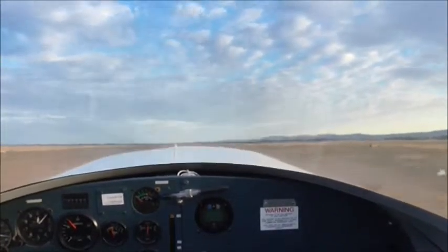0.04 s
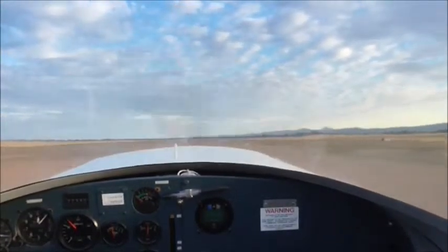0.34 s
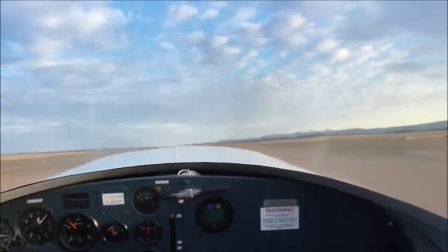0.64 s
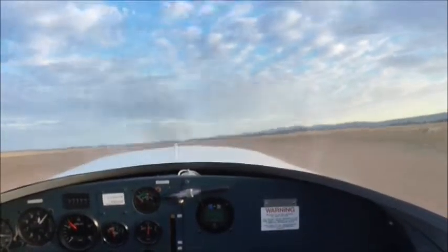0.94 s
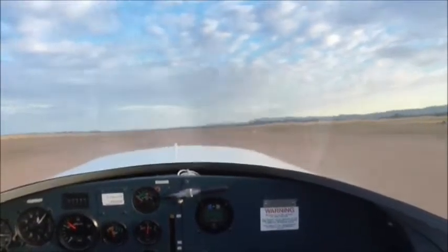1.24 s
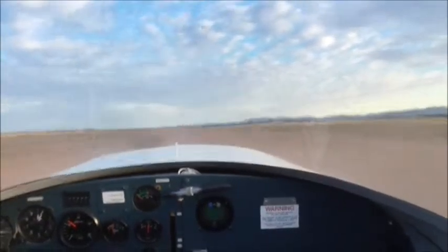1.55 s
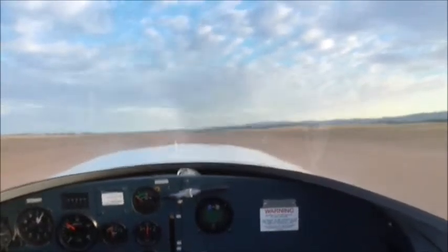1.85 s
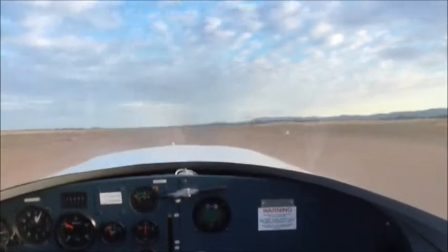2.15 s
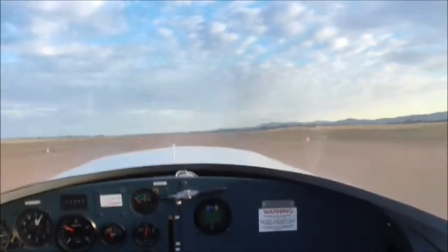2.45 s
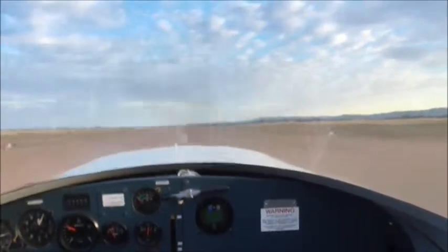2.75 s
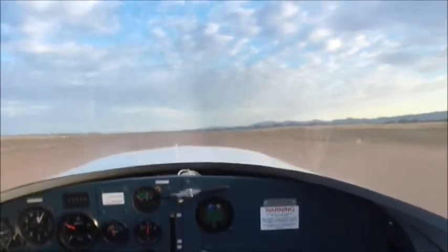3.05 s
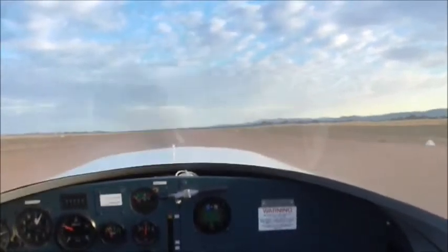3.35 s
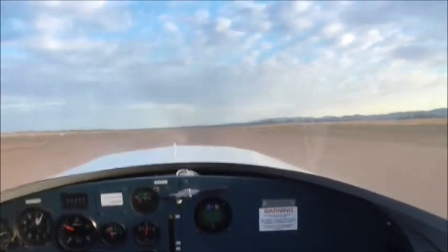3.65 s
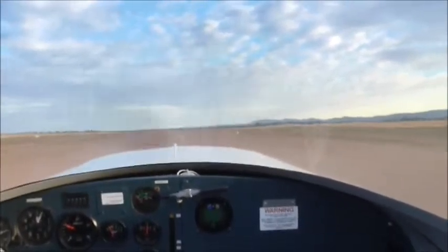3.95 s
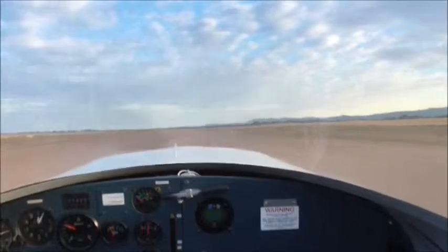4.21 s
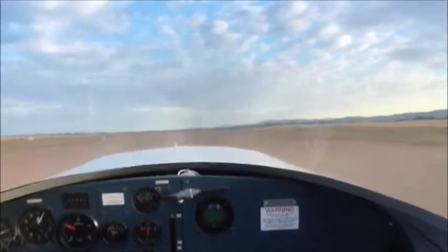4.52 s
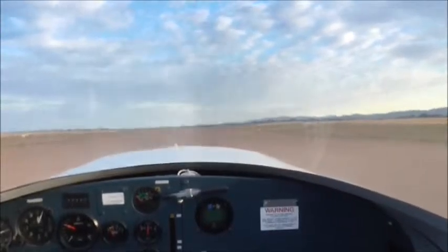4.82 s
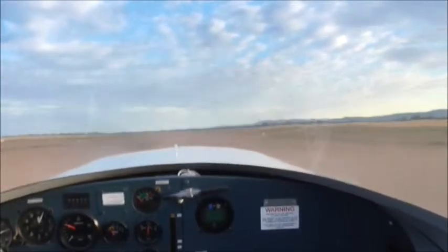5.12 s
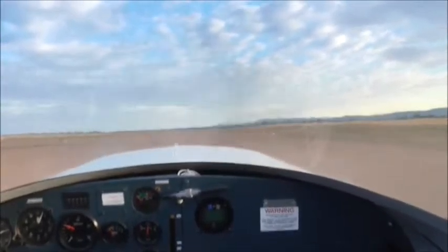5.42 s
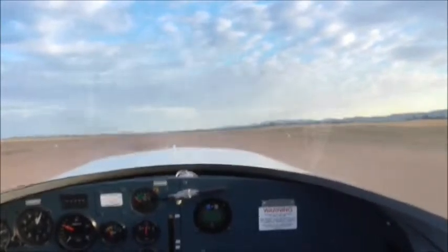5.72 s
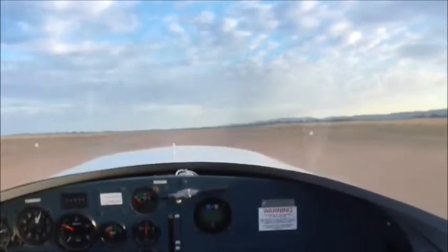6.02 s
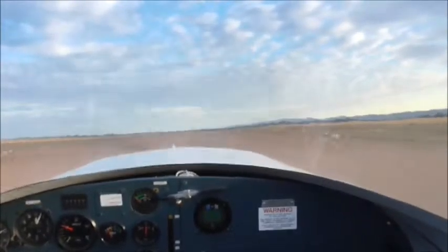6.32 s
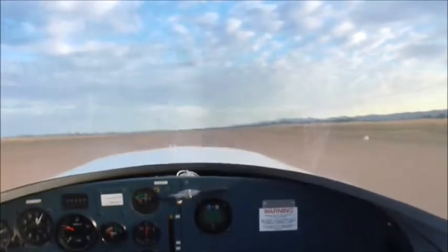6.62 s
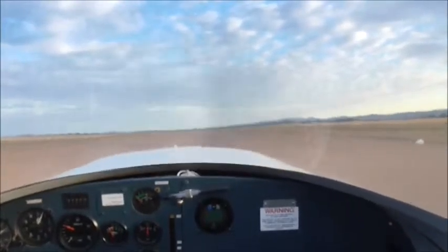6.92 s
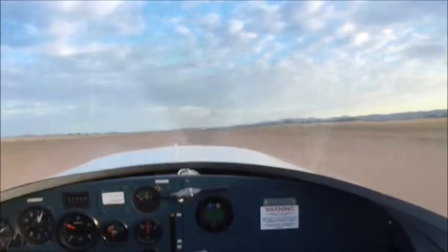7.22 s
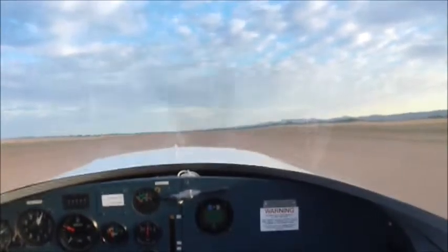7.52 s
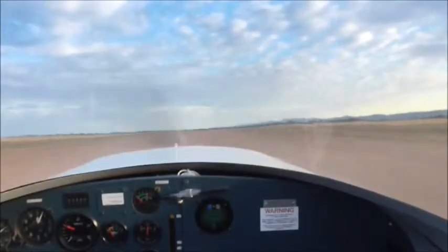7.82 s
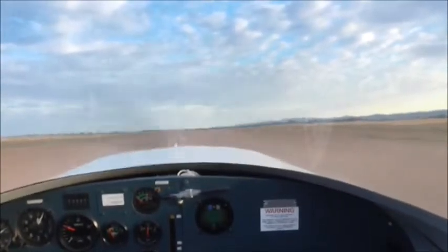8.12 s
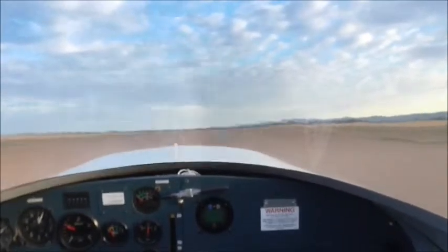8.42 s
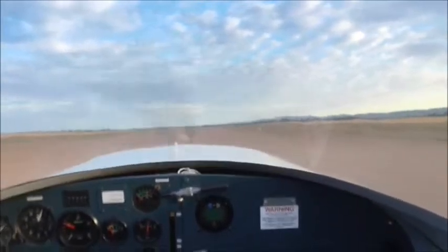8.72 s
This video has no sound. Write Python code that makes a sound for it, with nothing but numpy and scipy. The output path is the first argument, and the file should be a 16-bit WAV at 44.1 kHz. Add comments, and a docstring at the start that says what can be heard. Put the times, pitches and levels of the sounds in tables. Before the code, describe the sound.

Heard from inside the cockpit of a light aircraft, air hisses past the canopy over an idling propeller. After a second the wheels thump down hard and skip twice with brief tyre scrubs, while the air and engine drop away. Rough ground then drums on the hollow fuselage and gravel crunches under the tyres. Thrown stones crack against the skin, grit sprays underneath, and loose fittings rattle and tick.

```python
"""Air hisses past the canopy over an idling propeller: the cockpit of a light aircraft landing on gravel.
At 1 s the wheels thump down and skip twice. Rough ground then drums on the hollow fuselage, gravel
crunches under the tyres, thrown stones crack against the skin and loose fittings rattle.
Engine and thumps are sums of sines; the rest is enveloped noise shaped by spectra and damped modes."""
import sys
import numpy as np
from scipy import signal
from scipy.fft import rfft, irfft, next_fast_len
from scipy.io import wavfile
from scipy.ndimage import uniform_filter1d, minimum_filter1d

SR = 44100
rng = np.random.default_rng(int(sys.argv[2]) if len(sys.argv) > 2 else 0)


def transcribe(u):
    """Save the signal u as a 16-bit wav file named by the first command-line argument.

    u: samples, shape (n,) or (channels, n), limited to [-1, 1]; the rate is SR.
    q: integer samples, one column per channel.
    """
    v = np.clip(np.atleast_2d(u).T, -1, 1)
    q = np.round(v * 32767).astype(np.int16)
    wavfile.write(sys.argv[1], SR, q)


N = 390726
FFT_SIZE = next_fast_len(N + 8192)
TIME_S = np.arange(N) / SR
FREQ_HZ = np.maximum(np.arange(FFT_SIZE // 2 + 1) * SR / FFT_SIZE, 1)
TOUCHDOWN_S = .983
ROLLED_S = TIME_S - TOUCHDOWN_S

# Table levels are relative; sigma is the half length of a bell-shaped swell.
SIDE_SPECTRUM = [(60, -39), (110, -17), (200, -13.5), (380, -15.5), (700, -6.5), (1290, -7.5), (2380, -5),
                 (4400, -6.5), (8120, -5.5), (15000, 0.5)]  # stereo side over mid: f/Hz, level/dB

BLADE_RATE_HZ = [(0, 42.8), (.5, 42.2), (.85, 39.57), (1.1, 38.2), (1.35, 35.1), (1.75, 33.2), (2.3, 32.2),
                 (3, 31.16), (8.86, 28.06)]  # propeller blade passes: t/s, f/Hz
ENGINE_DB = [(0, -32.5), (.9, -30), (1.15, -40), (1.8, -62), (3, -52.5), (8.86, -47)]  # idling engine: t/s, level/dB
BLADE_HARMONICS = [(1, 1.5), (2, 8), (3, 8.5), (4, -8), (5, 2), (6, 6), (8, -1), (9, -3), (11, -6)]  # propeller tones: multiple of blade rate, level/dB
AIRFLOW_DB = [(0, -15), (.2, -17.5), (.36, -15.5), (.55, -17.5), (.8, -16), (.89, -18), (.955, -14.5),
              (1.05, -23.5), (1.5, -27), (2.5, -30.5), (8.86, -32.5)]  # slipstream: t/s, level/dB
AIR_SPECTRUM = [(15, -45), (30, -40), (58, -18), (100, -4), (150, -12.5), (220, -3.5), (300, -11.5),
                (370, -11), (530, -17), (1000, -25), (2000, -30), (2900, -39.5), (4000, -34), (7000, -43.5),
                (15000, -59)]  # slipstream: f/Hz, level/dB
CABIN_AIR_MODES = [(101, 18, -1), (225, 35, 1), (348, 20, 4), (750, 40, 3)]  # air-driven resonances: f/Hz, width/Hz, level/dB
SEAL_GUSTS = [(0.053, -32, 0.032), (.298, -30, 0.0091), (0.823, -31, 0.022), (0.954, -31.5, 0.006)]  # gusts at the canopy seal: t/s, level/dB, sigma/s
GUST_SPECTRUM = [(300, -20), (1000, 5), (2000, 6), (2900, -2), (4200, 2.5), (7000, -9), (15000, -32)]  # rasp of the seal: f/Hz, level/dB

# touchdown thumps, with a brief 1 kHz overload overtone on the first: t/s, level/dB, f/Hz, t60/s
TOUCHDOWN_THUMPS = [(.9815, 8.5, 201, .25), (.99, -20, 1000, .15), (1.004, -13, 460, .15),
                    (1.027, -4, 262, .4), (1.032, -9, 475, .12), (1.052, -15, 640, .3),
                    (1.1255, 4.5, 212, .07), (1.553, -7, 345, .25)]
TYRE_LOAD_DB = [(1.1, -17.5), (1.21, -19.5), (1.4, -13.5), (1.49, -18.5), (1.55, -12.5), (2.13, -21),
                (2.23, -12.5), (2.59, -19.5), (2.75, -16.5), (4.1, -15), (5.1, -16), (8.86, -16)]  # tyre load as rumble, dipping at the skips: t/s, level/dB
GROUND_RUTS = [(4.55, -21), (4.845, -13.5), (7.25, -15), (7.61, -15.5)]  # ruts knocking the fuselage: t/s, level/dB
RUMBLE_SPECTRUM = [(15, -54), (28, -41), (35, -20), (65, -27), (95, -13.5), (130, -12), (150, -19),
                   (190, -7.5), (295, -13.5), (350, -9.5), (470, -14), (700, -27), (1000, -36.5),
                   (2000, -74)]  # ground rumble: f/Hz, level/dB
FUSELAGE_MODES = [(101, 11, 3.5), (127.4, 6.9, 4.5), (169, 11, -1.5), (268, 31, 5), (339, 19, -2),
                  (370, 24, -5), (461, 13, 0), (632, 29, 1)]  # hollow fuselage: f/Hz, width/Hz, level/dB
CRUNCH_SPECTRUM = [(300, -41), (700, 3.5), (1000, 6), (1500, 5), (2100, -6), (2600, -10.5), (3200, -20.5),
                   (4200, -27), (7000, -39), (14000, -64)]  # gravel under the tyres: f/Hz, level/dB
UNDERCARRIAGE_MODES = [(777, 30, 3), (935, 35, -1), (1062, 40, 1), (1245, 25, -2), (1385, 45, -1),
                       (1545, 28, 2), (1633, 20, 4), (1818, 24, -3), (1897, 18, 2), (1928, 16, -2),
                       (2012, 14, -1), (2065, 22, -4), (2130, 20, -7), (2235, 20, -6)]  # wheel assemblies: f/Hz, width/Hz, level/dB

SHAKE_DB = [(1, -52), (2.4, -49), (2.56, -58), (2.68, -51.5), (3.9, -48), (4.1, -52), (4.3, -46.5),
            (4.75, -49), (5.06, -53), (5.3, -51), (5.85, -49), (6.7, -49.5), (8.86, -48)]  # shaking between jolts: t/s, level/dB
FITTING_JOLTS = [(.98, -31, 0.26), (1.12, -42, 0.15), (1.29, -45, 0.36), (1.7, -48, 1), (2.16, -39.5, 0.2),
                 (2.27, -43, 0.5), (2.655, -43, 0.31), (3.01, -43, .4), (3.37, -54, .3), (3.44, -48, 0.78),
                 (3.68, -49, 1.6), (4.34, -43, 0.23), (4.54, -49, 0.83), (5.125, -39, 0.44),
                 (5.19, -49, 0.27), (5.37, -44, .5), (5.45, -42.5, 0.69), (5.69, -42, .3),
                 (5.87, -42, 0.18), (6.87, -42.5, 0.65), (7.25, -45, 1), (7.53, -44, .4),
                 (7.745, -39, 0.21), (8.03, -46, 0.19), (8.45, -55, .7), (8.63, -42, 0.7), (8.82, -49, .4)]  # jolts to the fittings: t/s, level/dB, t60/s
RATTLE_SPECTRUM = [(1500, -4), (2800, 0), (4000, 2.5), (6500, 1.5), (8000, -0.5), (9100, 3), (10400, -6.5),
                   (11600, -4), (13000, -14), (15500, -45)]  # loose fittings: f/Hz, level/dB
UNDERCARRIAGE_KNOCKS = [(.985, -12, .15), (1.0345, -20, 0.16), (1.335, -21, 0.1)]  # blows to the shell: t/s, level/dB, t60/s
SHELL_MODES = [(350, 70, -3), (543, 100, 13), (680, 140, -7), (1010, 220, -1), (1390, 250, -11),
               (2030, 400, -5)]  # hollow knock: f/Hz, width/Hz, level/dB
SHELL_SPECTRUM = [(150, -20), (400, 2), (2200, -7), (3200, -12), (8000, -30)]  # hollow knock: f/Hz, level/dB
SHARP_TICKS = [(.9983, -24), (1.192, -29), (1.2857, -36), (1.4765, -34), (2.2829, -40), (3.2637, -34),
               (3.4817, -37), (4.66, -32), (5.1215, -37), (5.2023, -40), (5.3805, -33), (5.396, -36),
               (5.4715, -31), (5.9925, -38), (6.3175, -32), (6.3457, -34), (6.3907, -31), (6.4594, -31),
               (7.1174, -30), (7.1362, -32), (7.3145, -30), (7.3594, -34), (7.4337, -37), (7.4918, -30),
               (7.5335, -36), (7.5489, -31), (7.6856, -33), (7.727, -29), (7.9163, -32), (7.928, -36),
               (8.0663, -32), (8.083, -31), (8.1255, -29), (8.141, -31), (8.643, -28)]  # hardest contacts of the fittings: t/s, level/dB
TICK_SPECTRUM = [(2000, -22), (4000, -5), (7000, 0), (10000, -3), (11800, -2), (13500, -9), (15500, -16)]  # hard contact: f/Hz, level/dB
METAL_MODES = [(8850, 260, -1), (9400, 300, -4), (11370, 220, 1)]  # small metal part: f/Hz, nominal width/Hz, level/dB
JINGLE_DB = [(.9, -90), (1.05, -66), (1.9, -60), (3.4, -62), (4.3, -69), (8.86, -71)]  # its ringing: t/s, level/dB

CABIN_BOOM_MODES = [(106, 19, -28), (209, 33.4, -16), (264, 32, -27), (348, 42, -27.5)]  # cabin air on even ground: f/Hz, nominal width/Hz, level/dB
GROUND_BUMPS = [(1.205, -13, 209), (1.293, -12.5, 209), (1.353, -19.5, 106), (1.381, -15, 348),
                (1.413, -10.5, 209), (1.735, -9, 209), (1.953, -17.5, 106), (1.977, -12.5, 209),
                (2.119, -9.5, 209), (2.239, -10, 348), (2.175, -12.5, 209), (2.32, -11.5, 209),
                (2.394, -17, 106), (2.771, -19, 106), (2.804, -8.5, 209), (3.03, -15, 209),
                (3.308, -11, 209), (3.347, -24, 106), (3.491, -13.5, 264), (3.596, -10.5, 209),
                (3.657, -19, 106), (3.793, -6.5, 209), (4.008, -19, 106), (4.08, -14.5, 348),
                (4.396, -11.5, 264), (4.418, -11, 209), (4.635, -14, 348), (4.708, -15, 209),
                (4.924, -15.5, 264), (5.208, -8, 209), (5.46, -12, 209), (5.637, -11, 209),
                (6.004, -13, 264), (6.26, -9.5, 209), (6.33, -12, 348), (6.412, -10.5, 209),
                (6.503, -12, 264), (6.858, -13, 264), (7.269, -11, 264), (7.388, -11, 209),
                (7.589, -13.5, 209), (7.772, -12.5, 209), (8.423, -13, 264), (8.48, -10, 209),
                (8.776, -11.5, 209)]  # bumps pumping the cabin air: t/s, level/dB, mode f/Hz
TYRE_SCRUBS = [(1.19, -39, .06, 1900, 350), (1.33, -37, 0.083, 1660, 160), (1.415, -33.5, 0.075, 1310, 260),
               (2.547, -35.5, 0.021, 1980, 160), (2.564, -39, 0.049, 1370, 200),
               (2.7, -40, 0.12, 1930, 400)]  # skids: t/s, level/dB, sigma/s, f/Hz, nominal width/Hz
GRIT_SPRAYS = [(1.295, -28, 0.048, -23), (1.714, -23, 0.045, -20), (2.438, -33, 0.034, -22),
               (2.683, -26.5, 0.055, -25), (3.045, -47, .02, 0), (3.972, -28, 0.038, -16),
               (4.843, -31.5, 0.023, -2), (7.083, -28.5, 0.038, -14), (8.52, -26.5, 0.069, -15.5)]  # grit along the belly: t/s, level/dB, sigma/s, scrape share/dB
GRIT_SPECTRUM = [(200, -36), (500, 16), (1000, 5.5), (2000, -18), (3200, -14.5), (5000, -18), (8000, -17.5),
                 (14000, -36)]  # coarse grit: f/Hz, level/dB
SCRAPE_SPECTRUM = [(600, -10), (1600, 7), (2400, 0), (4500, -5), (8000, -12), (15000, -26)]  # fine grit: f/Hz, level/dB
STONE_HITS = [(1.5303, -13.5, 0.074, -11, -5), (1.6065, -33, 0.094, -2, -2), (1.653, -16.5, .09, -17, -1.5),
              (1.6785, -22.5, 0.12, -20, -3), (1.825, -33, 0.086, -16, 10), (1.964, -30.5, .085, -16, 4),
              (2.4, -25.5, 0.11, -24, 0), (2.473, -34.5, 0.1, 5, -8), (2.9085, -22, 0.11, -17, 0),
              (2.981, -22.5, 0.073, -16, -1), (3.0187, -43, 0.051, -10, -6), (3.172, -45, .08, 0, -6),
              (3.299, -30, 0.14, -16, 1), (3.581, -30, 0.14, -20, 9), (3.6527, -32.5, 0.14, 0.5, -6),
              (4.547, -32, .1, -8, -2), (5.0065, -36.5, 0.13, -8, -8), (8.555, -29, 0.14, -21, -4)]  # stones on the skin: t/s, level/dB, t60/s, ring share/dB, knock share/dB
CRACK_SPECTRUM = [(1000, -10), (3000, -7), (4500, 0), (7000, 2), (9500, -2), (12000, 3), (13500, -8),
                  (15500, -15)]  # first contact of a stone: f/Hz, level/dB
SPLASH_SPECTRUM = [(100, -30), (400, 10.5), (900, 10.5), (2000, -5), (3000, -7), (4500, 0.5), (7500, -4),
                   (11500, -11), (15000, -31)]  # dense panel ringing: f/Hz, level/dB
PANEL_MODES = [(5600, 600, -9), (6500, 550, -3), (7200, 600, -2), (12400, 800, -8), (14800, 600, -13)]  # bright panel ring: f/Hz, width/Hz, level/dB


def undb(db):
    """Decibels to gain."""
    return 10 ** (np.asarray(db) / 20)


def curve(table):
    """Linear interpolation of (t/s, value) rows."""
    return np.interp(TIME_S, *np.transpose(table))


def unit(x):
    """Scale to unit rms."""
    return x / np.sqrt(np.mean(x ** 2))


def colour(spectrum):
    """Gain per bin from (f/Hz, level/dB) rows."""
    hz, db = np.transpose(spectrum)
    return undb(np.interp(np.log(FREQ_HZ), np.log(hz), db))


def resonances(modes):
    """Power response of damped modes."""
    return sum(undb(db) ** 2 / (1 + ((FREQ_HZ ** 2 - hz ** 2) / (FREQ_HZ * width_hz)) ** 2)
               for hz, width_hz, db in modes)


def cabin_noise(envelope, response, side_db=0):
    """Enveloped, filtered stereo noise: bass alike on both sides, treble from all around."""
    drive = rng.standard_normal((2, N)) * envelope
    mid, side = rfft(drive, FFT_SIZE) * unit(response)
    side = side * colour(SIDE_SPECTRUM) * undb(side_db)
    return irfft(np.array([mid + side, mid - side]), FFT_SIZE)[:, :N]


def wander(rate_hz):
    """Smooth random drift, unit rms."""
    hold = max(int(SR / rate_hz), 1)
    steps = np.repeat(rng.standard_normal(N // hold + 1), hold)
    return unit(uniform_filter1d(uniform_filter1d(steps, hold), hold)[:N])


def impacts(per_s, spread_db):
    """Random blows, many small, few large."""
    hits = rng.random(N) < per_s / SR
    return hits * undb(spread_db * np.minimum(rng.exponential(size=N), 3))


def ring_out(blows, t60_s):
    """Envelope of blows whose energy dies away."""
    retained = np.exp(-2 * np.log(1000) / (t60_s * SR))
    return np.sqrt(signal.lfilter([1], [1, -retained], blows ** 2))


def grains(per_s, spread_db, t60_s):
    """Unit-rms envelope of random decaying blows."""
    return unit(ring_out(impacts(per_s, spread_db), t60_s))


def decay(start_s, t60_s, rise_s):
    """Envelope of one blow."""
    age_s = np.maximum(TIME_S - start_s, 0)
    return (1 - np.exp(-age_s / rise_s)) * np.exp(-np.log(1000) * np.minimum(age_s / t60_s, 10))


def swell(crest_s, sigma_s):
    """Bell-shaped envelope."""
    return np.exp(-.5 * ((TIME_S - crest_s) / sigma_s) ** 2)


def slipstream():
    """Turbulent air hisses at the canopy and booms in the cabin."""
    response = colour(AIR_SPECTRUM) * np.sqrt(1 + resonances(CABIN_AIR_MODES))
    flutter_db = .7 * wander(25)
    return cabin_noise(undb(curve(AIRFLOW_DB) + flutter_db), response, side_db=.5)


def engine(firings_per_blade=2.39, firing_db=10.5):
    """Propeller and geared engine wind down as the airspeed stops driving them."""
    blade_hz = curve(BLADE_RATE_HZ) * (1 + .003 * wander(12))
    phase = 2 * np.pi * np.cumsum(blade_hz) / SR
    blades = sum(undb(db + wander(6)) * np.sin(order * phase + rng.uniform(0, 2 * np.pi))
                 for order, db in BLADE_HARMONICS)
    firing = undb(firing_db + .8 * wander(5)) * np.sin(firings_per_blade * phase)
    return (blades + firing) * undb(curve(ENGINE_DB))


def gusts():
    """Brief gusts rasp at the canopy seal."""
    puffs = sum(undb(db) * swell(t_s, sigma_s) for t_s, db, sigma_s in SEAL_GUSTS)
    return cabin_noise(puffs * undb(2 * wander(148)), colour(GUST_SPECTRUM))


def thumps(cutoff_hz=110):
    """The shell booms at touchdown, with little below 110 Hz; an overload overtone tops the first."""
    rings = sum(undb(db) * decay(t_s, t60_s, rise_s=.003) * np.sin(2 * np.pi * hz * (TIME_S - t_s))
                for t_s, db, hz, t60_s in TOUCHDOWN_THUMPS)
    return signal.sosfilt(signal.butter(3, cutoff_hz, "highpass", fs=SR, output="sos"), rings)


def rumble(grounded):
    """Rough ground and ruts drum on the hollow fuselage."""
    load = undb(curve(TYRE_LOAD_DB) + .5)
    ruts = sum(undb(db) * swell(t_s, sigma_s=.035) for t_s, db in GROUND_RUTS)
    body = colour(RUMBLE_SPECTRUM) * np.sqrt(1 + resonances(FUSELAGE_MODES))
    return cabin_noise(grounded * np.hypot(load, ruts), body, side_db=-.5)


def crunch(grounded, fade_db_per_s=.33):
    """Gravel crunches under the tyres: louder with load and on a loose patch, fading as they slow."""
    gravel = grains(per_s=2500, spread_db=5, t60_s=.017)
    level_db = -29 + .39 * curve(TYRE_LOAD_DB) - fade_db_per_s * ROLLED_S + 1.34 * wander(18)
    loose_db = 4.5 * swell(crest_s=8.43, sigma_s=.34)
    envelope = gravel * grounded * undb(level_db + loose_db)
    return cabin_noise(envelope, colour(CRUNCH_SPECTRUM), side_db=-.5)


def whirr(grounded, fade_db_per_s=.62):
    """The wheel assemblies ring, less as they slow."""
    envelope = grounded * undb(-32 - fade_db_per_s * ROLLED_S)
    return cabin_noise(envelope, np.sqrt(resonances(UNDERCARRIAGE_MODES)), side_db=-3.5)


def shaking():
    """Envelope driving the fittings: uneven ground plus jolts."""
    steady = undb(curve(SHAKE_DB) + .5 * wander(22))
    jolts = sum(undb(db) * decay(t_s, t60_s, rise_s=.0073) for t_s, db, t60_s in FITTING_JOLTS)
    return np.hypot(steady, jolts)


def rattles(shake, airframe):
    """Shaken fittings fizz, chatter and buzz on each crest of the airframe's swing."""
    swing = airframe.mean(axis=0)
    swing_rms = np.sqrt(uniform_filter1d(swing ** 2, size=6000) + 1e-4)
    buzz = undb(-5) * unit(np.maximum(swing / swing_rms, 0) ** 3)
    fizz = undb(-1 + 2.6 * wander(60))
    chatter = undb(-2.5) * grains(per_s=200, spread_db=2, t60_s=.015)
    envelope = shake * np.sqrt(fizz ** 2 + chatter ** 2 + buzz ** 2)
    return cabin_noise(envelope, colour(RATTLE_SPECTRUM), side_db=.5)


def shell(blows):
    """Hollow knock of the fuselage panels."""
    return cabin_noise(blows, np.sqrt(resonances(SHELL_MODES)) * colour(SHELL_SPECTRUM))


def gear_knocks():
    """The undercarriage knocks the shell as the wheels bite."""
    blows = sum(undb(db) * decay(t_s, t60_s, rise_s=.00091) for t_s, db, t60_s in UNDERCARRIAGE_KNOCKS)
    return shell(blows)


def ticks(shake):
    """Fittings make hard contact: sharp ticks among soft ones that thicken with time and shaking."""
    progress = np.clip(ROLLED_S / ROLLED_S[-1], 0, 1)
    blows = undb(-1) * shake * impacts(per_s=60 * progress * unit(shake), spread_db=.5)
    for t_s, db in SHARP_TICKS:
        blows[int(t_s * SR)] += undb(db)
    return cabin_noise(ring_out(blows, t60_s=.0085), colour(TICK_SPECTRUM), side_db=-2)


def jingle():
    """A small loose metal part is tapped; each mode rings in thin flecks."""
    out = 0
    for hz, width_hz, db in METAL_MODES:
        taps = grains(per_s=20, spread_db=1, t60_s=.14) * undb(curve(JINGLE_DB) + db)
        out += cabin_noise(taps, resonances([(hz, width_hz, 0)]), side_db=-2.5)
    return out


def boom(fade_in_s=.26, sigma_cycles=4.3):
    """The ground keeps the cabin modes ringing at unsteady pitch; each bump makes one throb."""
    modes_hz = np.array(CABIN_BOOM_MODES)[:, 0]
    out = 0
    for mode, (hz, width_hz, even_db) in enumerate(CABIN_BOOM_MODES):
        band = rfft(rng.standard_normal(FFT_SIZE)) * resonances([(hz, width_hz, 0)])
        ring = irfft(band, FFT_SIZE)[:N]
        ring /= np.sqrt(uniform_filter1d(ring ** 2, size=2600))  # flatten slow swells, keep fast beats
        bumps = sum(undb(db) * swell(t_s, sigma_cycles / hz) for t_s, db, bump_hz in GROUND_BUMPS
                    if np.argmin(abs(modes_hz - bump_hz)) == mode)
        even_ground = undb(even_db + 1.6 * wander(16))
        out += ring * np.hypot(even_ground, bumps)
    return out * np.clip(ROLLED_S / fade_in_s, 0, 1) ** 2


def scrubs(grounded):
    """Lightly loaded tyres scrub over the gravel and sing briefly."""
    skids = sum(cabin_noise(undb(db) * swell(t_s, sigma_s), resonances([(hz, width_hz, 0)]), side_db=-3)
                for t_s, db, sigma_s, hz, width_hz in TYRE_SCRUBS)
    return skids * grounded * undb(1.5 * wander(70))


def sprays():
    """A tyre flings grit along the belly; the finest scrapes brightly."""
    coarse, fine = 0, 0
    for t_s, db, sigma_s, scrape_db in GRIT_SPRAYS:
        patch = undb(db) * swell(t_s, sigma_s)
        coarse += patch
        fine += undb(scrape_db) * patch
    coarse *= grains(per_s=700, spread_db=6, t60_s=.06)
    fine *= grains(per_s=900, spread_db=2.5, t60_s=.015)
    grit = cabin_noise(coarse, colour(GRIT_SPECTRUM), side_db=-2)
    return grit + cabin_noise(fine, colour(SCRAPE_SPECTRUM))


def stones():
    """Each stone cracks on the skin, knocks the shell and leaves a splash of panel ringing."""
    crack, splash, ring, knock = 0, 0, 0, 0
    for t_s, db, t60_s, ring_db, knock_db in STONE_HITS:
        tail = decay(t_s, t60_s, rise_s=.0003)
        crack += undb(db - 1.5) * decay(t_s, t60_s=.012, rise_s=.0004)
        splash += undb(db) * tail
        ring += undb(db + ring_db) * tail
        knock += undb(db + knock_db) * decay(t_s, t60_s=.18, rise_s=.00081)
    skin = cabin_noise(splash, colour(SPLASH_SPECTRUM), side_db=-.5)
    skin += cabin_noise(ring, np.sqrt(resonances(PANEL_MODES)), side_db=-4)
    return cabin_noise(crack, colour(CRACK_SPECTRUM)) + skin + shell(knock)


def scene():
    """Glide, touchdown, roll."""
    grounded = np.clip(ROLLED_S / .0065, 0, 1)
    lean_left = undb([[.55], [-.55]])
    airframe = thumps() + gear_knocks() + scrubs(grounded) + rumble(grounded)
    airframe += lean_left * (crunch(grounded) + whirr(grounded)) + boom()
    shake = grounded * shaking()
    fittings = rattles(shake, airframe) + ticks(shake) + jingle()
    return engine() + slipstream() + gusts() + airframe + stones() + sprays() + fittings


def record(dry, low_hz=29, top_hz=15300, ceiling=1.3, hold_s=.006):
    """Microphone bass cut, peak limiter, clipping, treble cut."""
    sound = signal.sosfilt(signal.butter(4, low_hz, "highpass", fs=SR, output="sos"), dry)
    hold = int(hold_s * SR)
    gain = 1 / np.maximum(np.abs(sound).max(axis=0) / ceiling, 1)
    gain = uniform_filter1d(minimum_filter1d(gain, hold), hold)
    clipped = np.clip(sound * gain, -1, 1)
    return signal.sosfilt(signal.ellip(8, .2, 80, top_hz, fs=SR, output="sos"), clipped)


dry = scene()
out = record(dry)
transcribe(out)
```